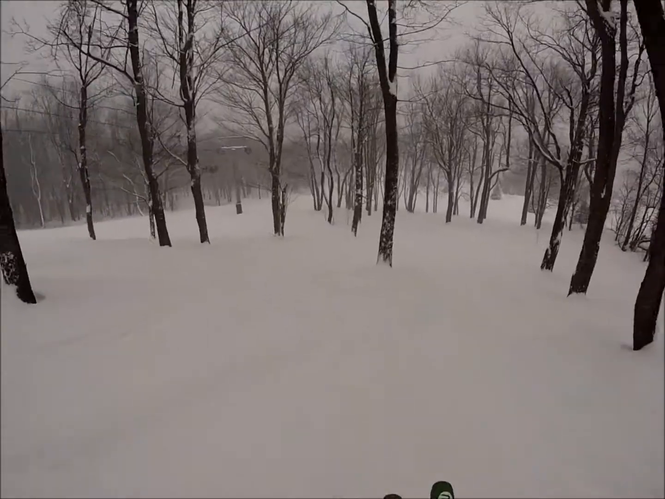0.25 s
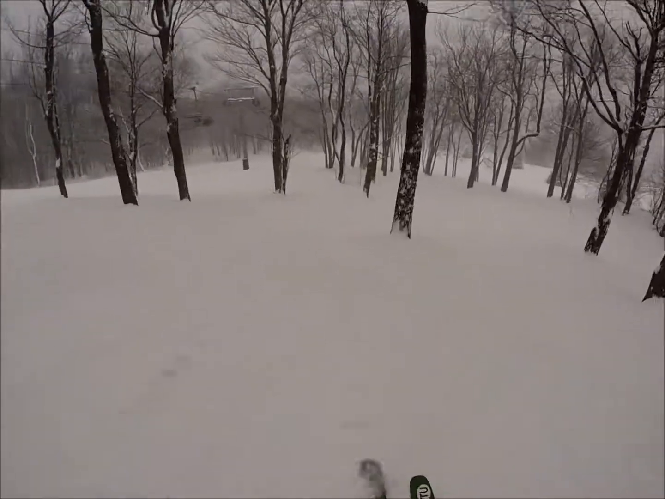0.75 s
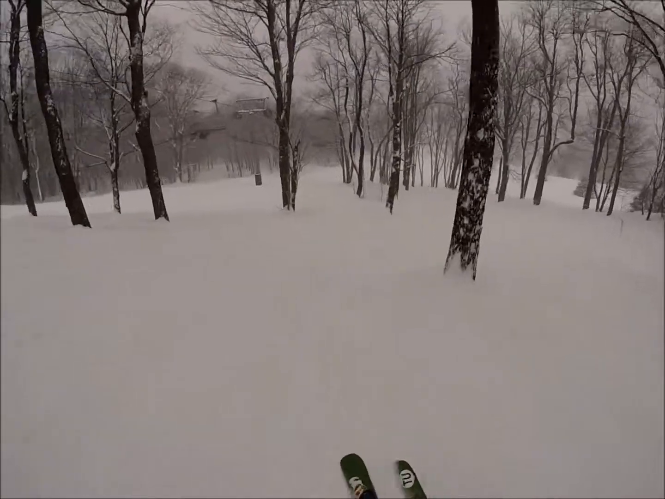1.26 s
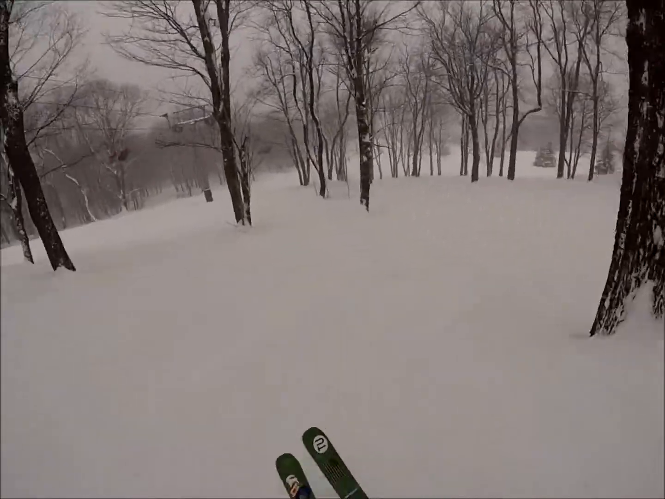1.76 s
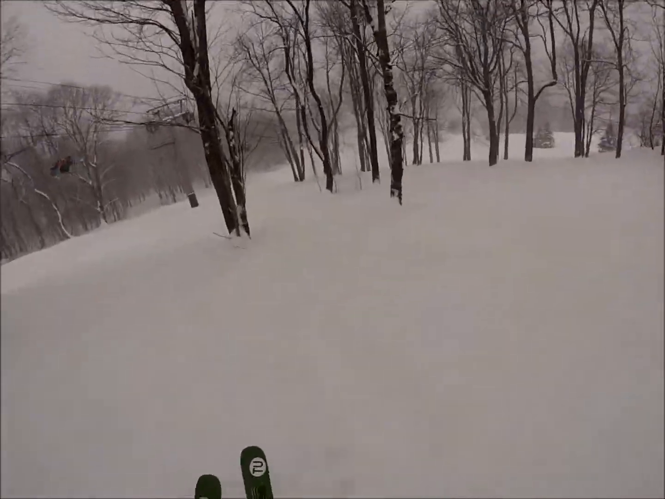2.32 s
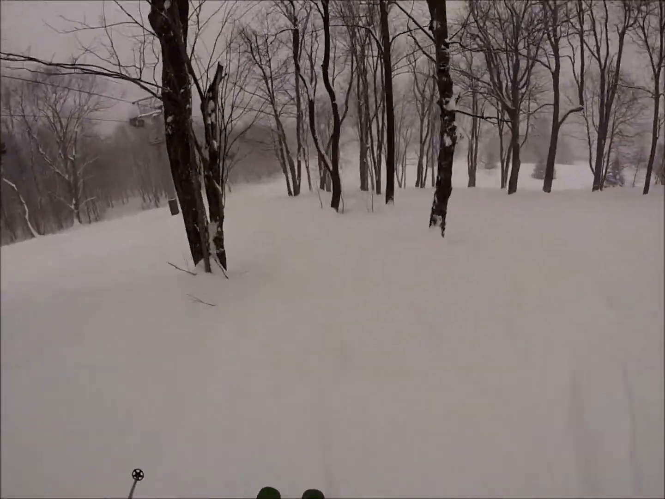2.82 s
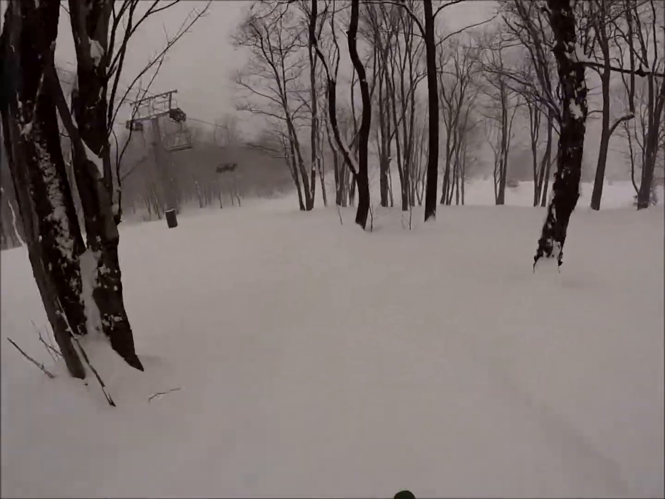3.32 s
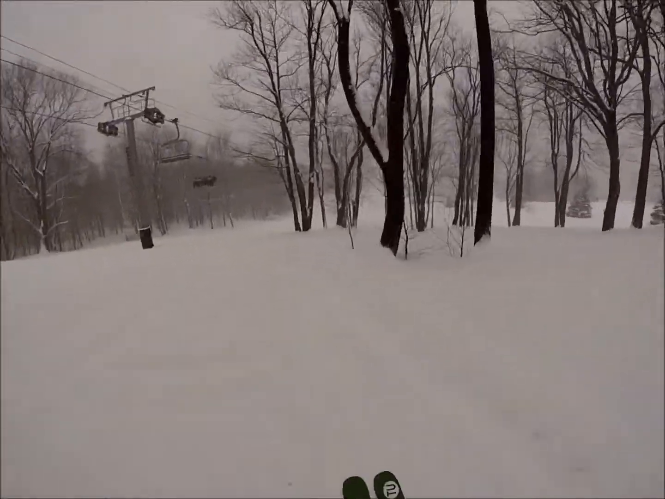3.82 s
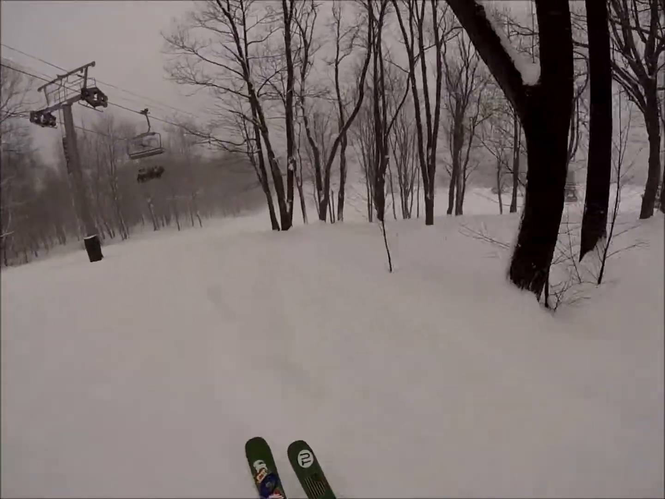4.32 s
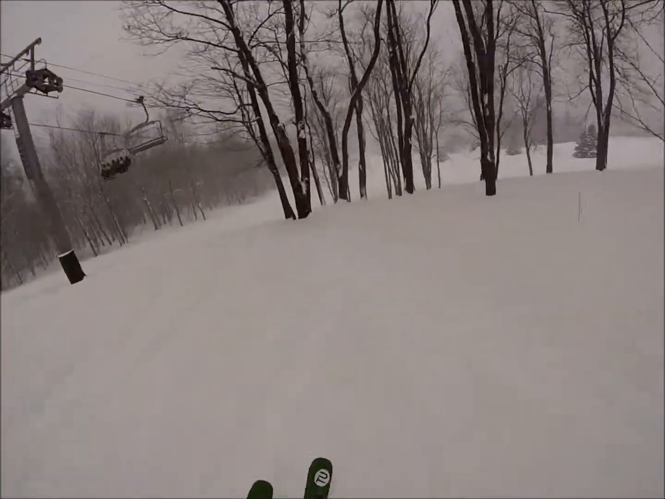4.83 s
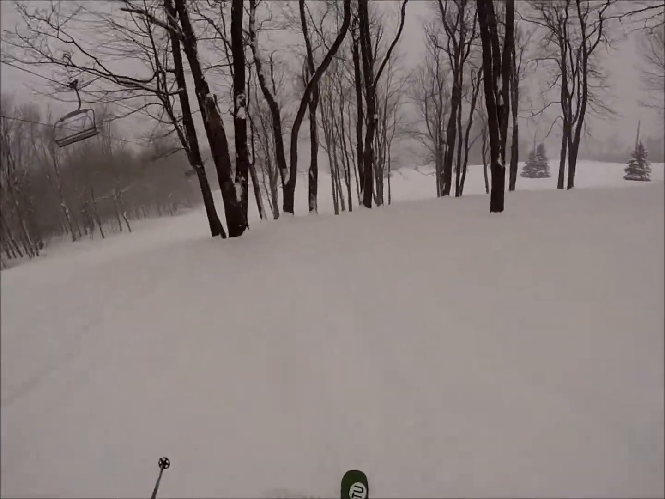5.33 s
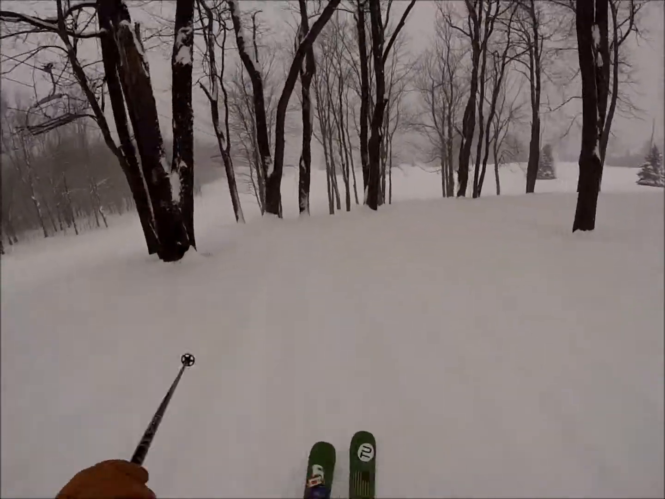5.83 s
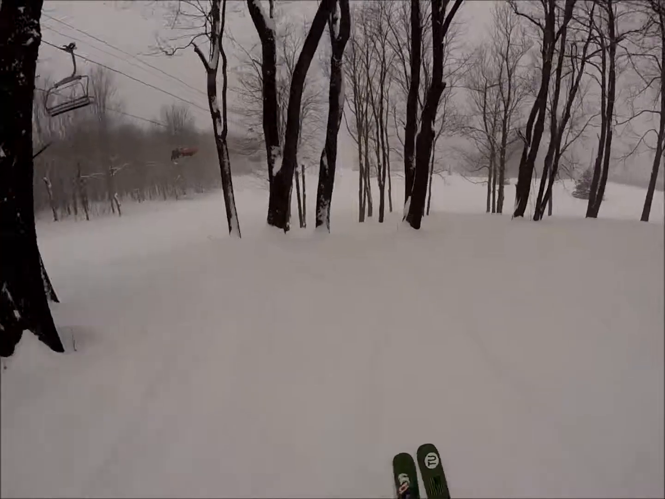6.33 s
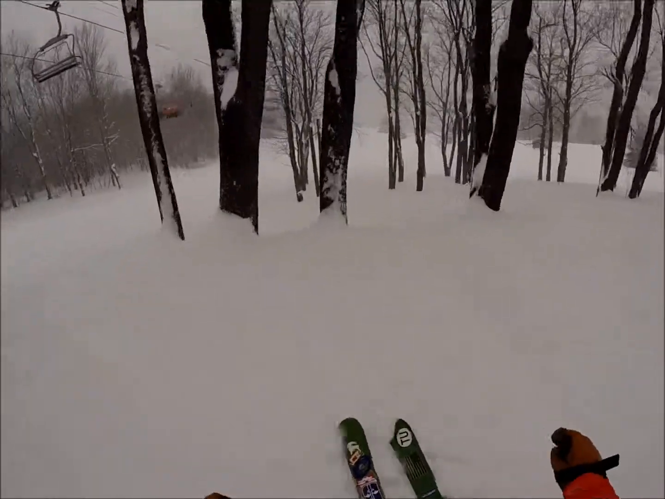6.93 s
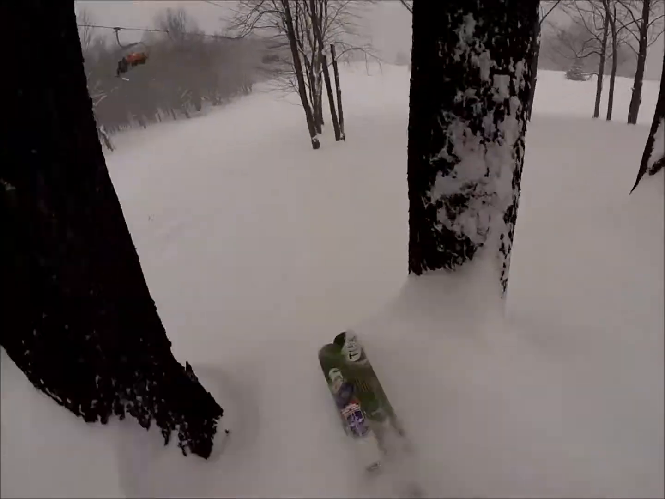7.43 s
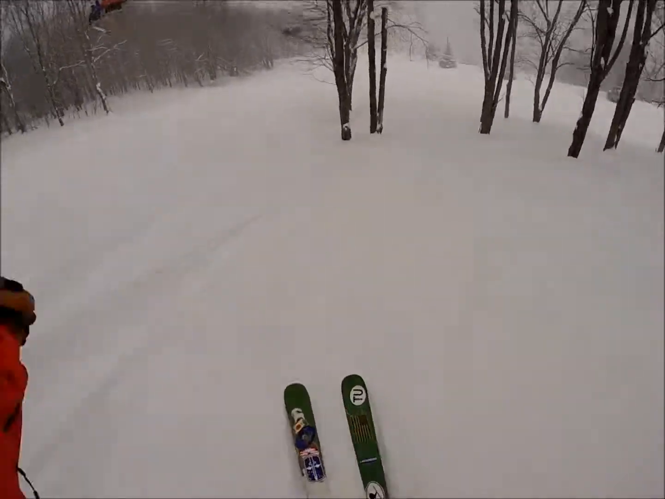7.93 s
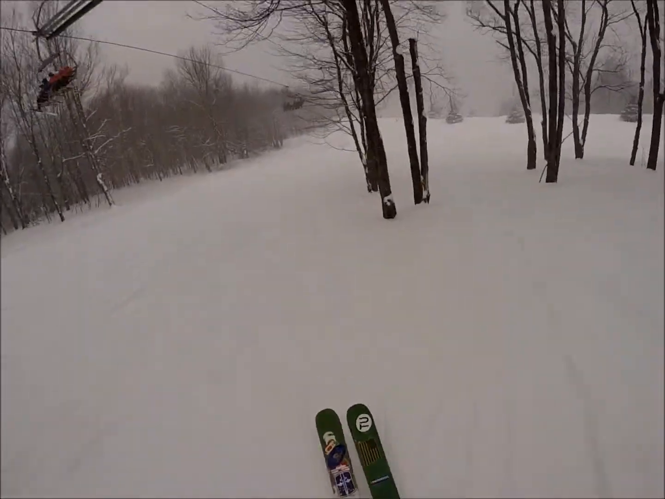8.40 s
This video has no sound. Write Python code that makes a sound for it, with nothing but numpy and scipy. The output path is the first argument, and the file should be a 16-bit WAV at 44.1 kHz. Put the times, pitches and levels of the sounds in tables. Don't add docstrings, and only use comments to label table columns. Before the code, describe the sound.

Boxy, rushing ski hiss on deep snow, covered by irregular crisp ticking of snowflakes on a hard shell, with deep wind buffeting underneath.

```python
import sys
import numpy as np
from scipy import signal
from scipy.fft import rfft, irfft, dct, next_fast_len
from scipy.io import wavfile
from scipy.ndimage import uniform_filter1d

SR = 44100
rng = np.random.default_rng(int(sys.argv[2]) if len(sys.argv) > 2 else 0)


def int16_out(signal):
    q = np.round(np.clip(np.atleast_2d(signal).T, -1, 1) * 32767)
    wavfile.write(sys.argv[1], SR, q.astype(np.int16))


def decibels_to_gain(level_db):
    exponent = np.asarray(level_db, float) / 20
    return 10 ** exponent


N = 381906


def level(x, db):
    return x * decibels_to_gain(db) / np.sqrt(np.mean(x ** 2))


def noise():
    return rng.standard_normal(N)


def colour(x, shape):
    size = next_fast_len(N)
    hz, db = np.transpose(shape)
    line_hz = np.arange(1, size // 2 + 2) * SR / size
    gain = decibels_to_gain(np.interp(np.log(line_hz), np.log(hz), db, left=-150, right=-150))
    return level(irfft(rfft(x, size) * gain, size)[:N], 0)


def walk(rate_hz):
    hold = int(SR / rate_hz)
    steps = np.repeat(rng.standard_normal(N // hold + 1), hold)
    return 1.7 * uniform_filter1d(uniform_filter1d(steps, hold), hold)[:N]


def curves(table):
    s, *columns = np.transpose(table)
    return [np.interp(np.arange(N) / SR, s, column) for column in columns]


def bells(table):
    t = np.arange(N) / SR
    return sum(np.outer(rise_db, np.exp(-(2 * (t - s) / length_s) ** 2)) for s, length_s, *rise_db in table)


# time_s [s], hiss_db [dB]
CARVE = [(0.0, -52.5), (0.41, -48), (0.53, -51.5), (0.65, -41.5), (1.28, -34), (2.92, -37.5), (3.98, -31),
         (4.29, -36), (5.96, -39.5), (6.29, -34.5), (6.61, -37), (6.85, -30.5), (7.31, -30), (7.52, -36.5),
         (7.98, -28.5), (8.42, -34.5), (8.47, -29.5), (8.66, -33)]
# peak_s [s], length_s [s], rise_db [dB]
BITES = [(.3, 0.088, 5), (1.15, 0.074, -0.5), (2.1, .2, 1.5), (2.33, 0.14, -3.5), (3.62, 0.067, -5.5),
         (3.76, 0.13, 1.5), (4.5, 0.27, 0), (4.72, 0.34, 3), (5.08, 0.069, 1), (6.25, .15, 1),
         (6.58, 0.086, -2), (8.59, 0.039, 4.5)]


def ski_pressure():
    return curves(CARVE)[0] + bells(BITES)[0]


# freq_hz [Hz], density_db [dB per Hz]
SKI_HISS = [(290, -13.5), (500, -18), (760, -19.5), (871, -9.5), (1030, -1.5), (1240, -11), (1610, -0.5),
            (2470, -1), (2930, -10.5), (3240, -6.5), (3720, -12), (4610, -14), (4990, -11.5), (5280, -5.5),
            (7500, -19.5), (9750, -62), (16500, -120)]
# time_s [s], above_hiss_db [dB]
FACING = [
    (0, -10.5),
    (1.3, -16.5),
    (2.4, -9.5),
    (3.55, -10.5),
    (3.7, -13.5),
    (4.3, -9.5),
    (5.0, -11.5),
    (5.2, -10),
    (6.8, -16),
    (8.66, -17.5),
]


def skis(hiss_db):
    cavity_db = hiss_db + curves(FACING)[0]
    out = 0
    for lo_hz, hi_hz, db in ((291, 1670, cavity_db + 11.0),
                             (1240, 3050, hiss_db + 1.24),
                             (3060, 8400, hiss_db - 5.5)):
        sos = signal.butter(3, (lo_hz, hi_hz), "band", fs=SR, output="sos")
        band = signal.sosfiltfilt(sos, colour(noise(), SKI_HISS))
        out = out + band * decibels_to_gain(db + .8 * walk(16))
    return out


# time_s [s], level_db [dB]
SPRAY = [
    (7.62, -68),
    (7.69, -48),
    (8.2, -50),
    (8.4, -56),
]


def spray():
    band = signal.butter(4, (6000, 7600), "band", fs=SR, output="sos")
    return decibels_to_gain(curves(SPRAY)[0]) * level(signal.sosfilt(band, noise()), 0)


def strike(landings):
    out, lead = np.zeros(N + 1024), 64
    shell_ring_hz, cavity_hz = 5180, 2405
    t = (np.arange(512) - lead) / SR
    chance = rng.standard_normal((len(landings), 512))
    high = signal.butter(2, (8000, 13500), "band", fs=SR, output="sos")
    push = np.exp(-t / 0.00017) / (1 + np.exp(-t / .00005))
    crush = np.exp(-abs(t) / 0.00072)
    after = (1 - np.exp(-np.maximum(t, 0) / 0.0011)) * np.exp(-t / 0.00089)
    cavity = decibels_to_gain(-7.5) * after * np.sin(2 * np.pi * cavity_hz * t)
    for (s, peak_db, hz, snap_db), puff in zip(landings, chance):
        knock = push * np.cos(2 * np.pi * hz * t + puff[0])
        ring_hz = shell_ring_hz * (1 + 0.014 * puff[1])
        ring = decibels_to_gain(-5.0) * after * np.sin(2 * np.pi * ring_hz * t + 2 * np.pi * puff[2])
        snap = decibels_to_gain(snap_db - 10.5) * crush * signal.sosfilt(high, puff)
        start = max(int(s * SR), 0)
        out[start:start + 512] += decibels_to_gain(peak_db + 6.0) * (knock + snap + ring + cavity)
    return out[lead:N + lead]


def middling(flurry_db, count=280):
    gap, size, pitch, snap = rng.standard_normal((count, 4)).T
    s = np.cumsum(np.exp(.9 * gap))
    s = s / s[-1] * (N - 1) / SR
    peak_db = flurry_db[(s * SR).astype(int)] + 28.5 + 3 * np.clip(size, -2, 1.8)
    pitch_hz = 4960 + 260 * pitch
    snap_db = -28.5 + 9.5 * snap
    return list(zip(s, peak_db, pitch_hz, snap_db))


# peak_s [s], peak_db [dB],
# pitch_hz [Hz], snap_db [dB above the peak]
FLAKES = [(.3297, -20, 5200, -16), (.636, -15.5, 4900, -26), (.6496, -14.5, 4940, -6),
          (.876, -10.5, 4870, -24), (.9985, -21, 5040, -24), (1.378, -17.5, 4900, -4),
          (1.4476, -21.5, 5470, 3), (1.7572, -16.5, 5080, -6), (1.8184, -14.5, 4800, -8),
          (2.0484, -16, 5000, -7), (2.3371, -11, 4830, -6), (2.4574, -17.5, 4390, -14),
          (2.9646, -18, 5150, -3), (3.2174, -4, 4350, -12), (3.5185, -13.5, 5000, -12),
          (3.7145, -12.5, 4450, -18), (3.7482, -13, 4850, -4), (4.015, -12, 4300, -15),
          (4.091, -8.5, 4830, -30), (4.1878, -13, 4400, -13), (4.353, -15, 5130, -1.5),
          (4.5553, -12.5, 5270, -5), (4.8564, -10.5, 4570, -10), (5.1995, -15, 4930, -8),
          (5.5838, -14.5, 5270, -8), (5.9728, -16, 4770, -11), (6.1452, -16, 4940, -7),
          (6.7179, -15.5, 5210, -10), (7.2047, -14, 5250, -17), (8.4627, -17.5, 6430, -8),
          (0.055, -26, 5300, -3),
    (.1925, -30.5, 5100, 2),
    (0.2436, -27.5, 5080, -20),
    (0.306, -23, 2670, -21),
    (.3492, -22, 5030, 2),
    (0.3985, -26, 5080, 0),
    (0.5345, -27.5, 5640, -1),
    (0.591, -23, 3200, -12),
    (.6092, -43, 4920, -6),
    (1.4468, -11.5, 2760, -18),
]


def flakes(flurry_db):
    return strike(FLAKES + middling(flurry_db))


# start_s [s], length_s [s], drop_db [dB]
LULLS = [(0.105, 0.11, 12.5), (.2, 0.215, 5), (0.485, 0.11, 7), (0.698, 0.059, 8), (2.22, 0.034, 18),
         (3.56, 0.082, 13), (5.765, 0.19, 4.5), (6.007, 0.059, 6.5), (7.42, 0.061, 3), (7.508, 0.15, 15),
         (8.05, 0.21, 3), (8.45, 0.19, 4)]


def shelter():
    t, edge_s = np.arange(N) / SR, 0.024
    drop = 0
    for s, length_s, db in LULLS:
        inside_s = np.minimum(t - s, s + length_s - t)
        drop = drop + db * np.clip(inside_s / edge_s + .5, 0, 1)
    return drop


# peak_s [s], length_s [s], rise_db [dB]
SHOWERS = [
    (1.8, 0.34, 3),
    (2.78, 0.17, 7),
    (3.35, 0.6, 2),
    (4.75, 0.065, 0.5),
    (5.1, 0.09, 2.5),
    (5.43, 0.051, 2),
    (6.65, 0.035, -1),
]


def snowfall(hiss_db):
    cruise_hiss_db = -36
    return -52 + 0.21 * (hiss_db - cruise_hiss_db) + bells(SHOWERS)[0] - shelter()


def patter(rate_hz, spread_db, crush_s):
    lands = rng.random(N) < rate_hz * decibels_to_gain(2.5 * walk(12)) / SR
    size = decibels_to_gain(np.minimum(spread_db * rng.exponential(1, N), 13))
    keep = np.exp(-1 / (crush_s * SR))
    return signal.lfilter([1], [1, -keep], lands * size) * noise()


# freq_hz [Hz], density_db [dB per Hz]
SHELL = [(2000, -21), (3200, -4.5), (3800, -14.5), (5200, -5.5), (6500, -13.5), (8000, -16), (11500, -17.5),
         (13500, -21.5), (16000, -26), (18000, -40)]
# freq_hz [Hz], density_db [dB per Hz]
SPARKLE = [(5000, -40), (7000, -3), (9500, 4.5), (12500, -6), (13500, -17), (16000, -8), (18000, -30)]


def flurry(flurry_db):
    knocks = colour(patter(290, 5.4, 0.0004), SHELL)
    fine = level(patter(520, 6.5, 0.0005), 0)
    air = level(noise(), -3)
    return decibels_to_gain(flurry_db + 10.0) * knocks + decibels_to_gain(flurry_db - 2.5) * colour(fine + air, SPARKLE)


# time_s [s], rumble_db [dB]
AIR = [(0, -48.5), (.75, -45), (.9, -43), (2.2, -42), (2.75, -44), (3.62, -41), (3.9, -41.5), (4.7, -44),
       (5.25, -40.5), (5.9, -44), (6.9, -38.5), (7.55, -40.5), (7.75, -29.5), (8.3, -38.5), (8.43, -37),
       (8.66, -38)]
# peak_s [s], length_s [s], buffet_rise_db [dB], gust_rise_db [dB]
PUFFS = [(0, .1, 10.5, 0), (.95, 0.2, 6.5, 15), (1.25, 0.33, -3, -5), (1.787, 0.077, 7, 6),
         (2.085, 0.26, 11, -7), (2.47, .08, 5.5, 8), (2.65, 0.097, 11.5, 11), (2.84, 0.087, 8, 10),
         (3.164, .1, 12, -8), (3.494, .1, 16, 14), (3.85, 0.068, 5, 6), (4.183, 0.28, 8, 5),
         (4.77, .1, 11, 2), (5.066, 0.09, 11.5, 20), (5.3, 0.25, -6, 18.5), (5.55, .15, -4, 13),
         (6.046, 0.081, 11.5, -11), (6.23, 0.13, -16, 1), (6.417, 0.13, 7, -2), (7.255, 0.53, 8.5, 11.5),
         (7.54, 0.21, 6, 17.5), (7.655, .08, 5.5, 11.5), (7.925, 0.16, 4, 9), (8.145, 0.19, 5, 20.5),
         (8.276, 0.092, 11, 16)]
# peak_s [s], length_s [s], rise_db [dB]
THUMPS = [
    (1.0, 0.18, 4),
    (2.2, 0.13, 2),
    (3.66, .12, 6),
    (5.2, 0.079, 1.5),
    (6.3, 0.18, 4),
    (6.7, 0.15, 2),
    (8.55, 0.13, 2),
]
# freq_hz [Hz], density_db [dB per Hz]
BUFFET = [(3, -79), (6, 0.5), (10, -1), (16, 3), (24, -4.5), (36, -31), (60, -56), (120, -94)]
# freq_hz [Hz], density_db [dB per Hz]
GUST = [(18, -52), (32, 3.5), (45, 3.5), (60, -25), (120, -52)]
# freq_hz [Hz], density_db [dB per Hz]
RUMBLE = [(26, -27), (45, -15.5), (65, -4.5), (99, -8), (145, -17), (215, -15), (347, -30.5), (700, -32.5),
          (910, -31), (1540, -120)]


def wind():
    air_db = curves(AIR)[0]
    buffet_rise_db, gust_rise_db = bells(PUFFS)
    buffet_db = air_db + 10 + buffet_rise_db
    gust_db = air_db - 5.5 + gust_rise_db
    rumble_db = air_db + 0.033 * gust_rise_db + bells(THUMPS)[0]
    buffet = colour(noise(), BUFFET)
    gust = colour(noise(), GUST)
    rumble = colour(noise() * decibels_to_gain(1.24 * walk(9)), RUMBLE)
    return decibels_to_gain(buffet_db) * buffet + decibels_to_gain(gust_db + 0.5) * gust + decibels_to_gain(rumble_db + 0.44) * rumble


def scene():
    hiss_db = ski_pressure()
    flurry_db = snowfall(hiss_db)
    snow = flakes(flurry_db) + flurry(flurry_db) + spray()
    return (skis(hiss_db) + snow + wind())[None]


def ragged_top(x, size=1024):
    calm_top_hz, top_hz = 15200, 15800
    padded = next_fast_len(N)
    lines = rfft(x, padded)
    hz = np.arange(padded // 2 + 1) * SR / padded
    body = irfft(lines * (hz < calm_top_hz), padded)[:N]
    top = irfft(lines * ((hz >= calm_top_hz) & (hz < top_hz)), padded)[:N]
    blocks = np.resize(np.diff(x, 2), (N // size + 1, size))
    crest = np.abs(blocks).max(axis=1) / blocks.std(axis=1)
    sharp = np.repeat(1. * (crest > np.quantile(crest, .6)), size)[:N]
    return body + top * uniform_filter1d(uniform_filter1d(sharp, size // 4), size // 4)


# start_s [s], length_s [s], step_db (coarseness of the rounding) [dB]
STARVED = [(.363, .014, -35), (.523, .007, -38), (.594, .006, -38), (.704, .007, -31), (1.172, .009, -30),
           (1.342, .008, -29), (2.149, .013, -27), (3.221, .012, -28), (3.262, .012, -28),
           (3.672, .022, -28), (3.968, .025, -27), (4.735, .011, -26), (4.906, .014, -28),
           (5.012, .01, -30), (5.887, .013, -30), (6.741, .009, -27), (7.358, .008, -26),
           (7.503, .013, -24), (8.357, .012, -27)]


def starve(x):
    out, fade, spill = x.copy(), 260, 520
    for s, length_s, kept_db in STARVED:
        a, size = int(s * SR) - spill, int(length_s * SR) + 2 * spill
        block = x[a:a + size]
        hz = np.arange(size) * SR / 2 / size
        step = decibels_to_gain(11.5 + kept_db - 3.5 * (hz > 3000))
        lines = np.round(dct(block, norm="ortho") / step) * step * (hz < 7830)
        kept = dct(lines, type=3, norm="ortho")
        edge = np.minimum(np.arange(size), np.arange(size)[::-1])
        hole = np.sin(np.clip((edge - spill) / fade + .5, 0, 1) * np.pi / 2) ** 2
        warble = np.sin(np.clip(edge / spill, 0, 1) * np.pi / 2) ** 2
        out[a:a + size] = (1 - hole) * (1 - warble / 2) * block + warble * kept * (1 + hole) / 2
    return out


def band_limit(x):
    return signal.sosfilt(signal.butter(12, 16500, fs=SR, output="sos"), x)


def record(dry):
    mix = starve(ragged_top(dry[0]))[None]
    return band_limit(mix)


dry = scene()
out = record(dry)
int16_out(out)
```